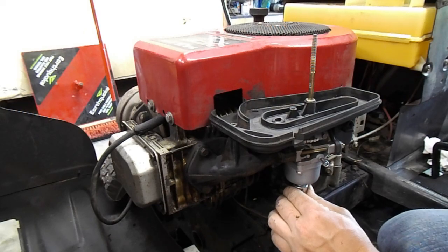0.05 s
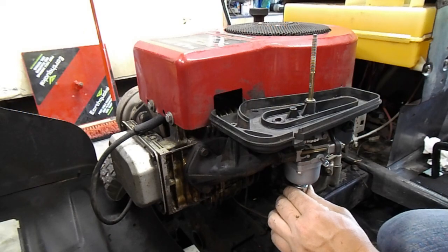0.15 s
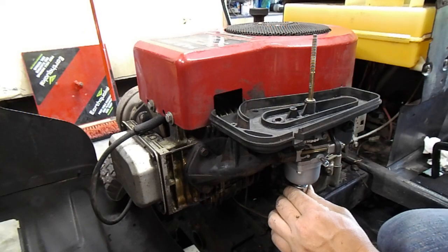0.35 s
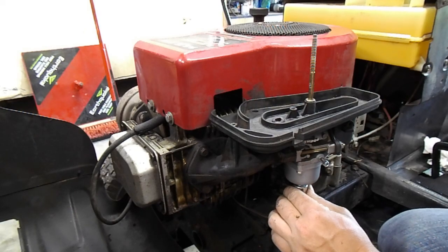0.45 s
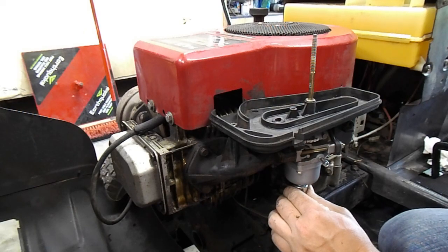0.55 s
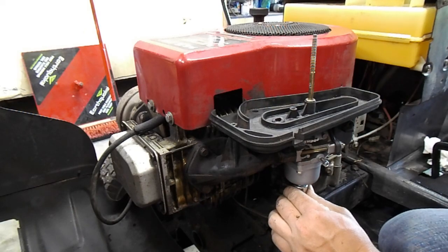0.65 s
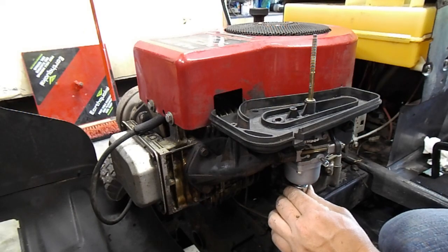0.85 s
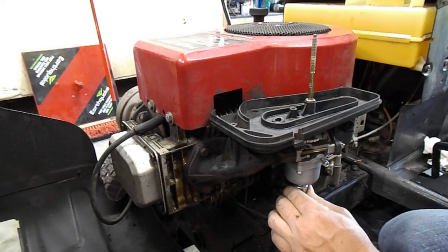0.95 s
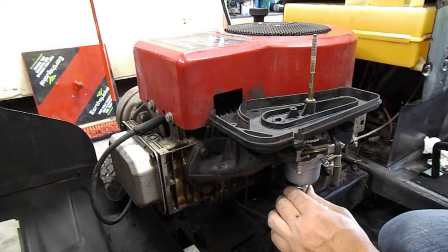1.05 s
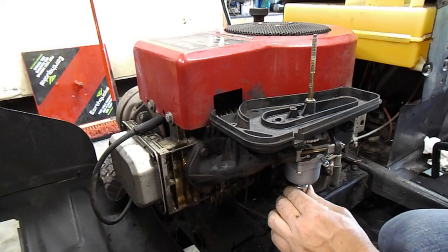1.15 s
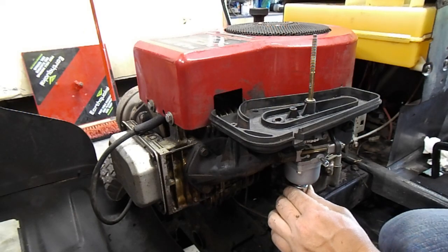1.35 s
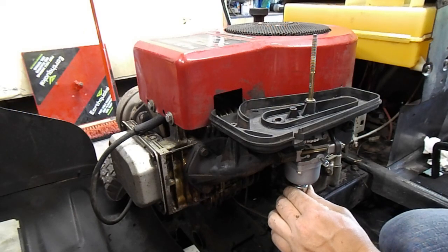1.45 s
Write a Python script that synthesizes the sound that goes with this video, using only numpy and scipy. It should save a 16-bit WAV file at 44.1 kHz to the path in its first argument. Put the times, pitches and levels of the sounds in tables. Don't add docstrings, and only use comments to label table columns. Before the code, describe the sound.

Close mono pickup of a solenoid snapping on and off: crackling contact ticks and a short ringing plunger knock, three times, with thin high wire rubs between, short room echo, low beating hum and soft rush.

```python
import sys
import numpy as np
from scipy import signal
from scipy.fft import rfft, irfft
from scipy.io import wavfile

SR = 44100
rng = np.random.default_rng(int(sys.argv[2]) if len(sys.argv) > 2 else 0)


def wrap_up_sound(samples):
    columns = np.atleast_2d(samples).T
    tamed = np.clip(columns, -1, 1)
    steps = np.round(tamed * 32767).astype(np.int16)
    wavfile.write(sys.argv[1], SR, steps)


def gain_from_db(level_db):
    decades = np.asarray(level_db, float) / 20
    return 10 ** decades


N = 66150


def at_hz(points, hz):
    table_hz, table_db = np.transpose(points)
    return np.interp(np.log(hz), np.log(table_hz), table_db)


def rms_one(x):
    return x / np.sqrt(np.mean(x ** 2) + 1e-20)


def colour(x, db_at):
    hz = np.maximum(np.fft.rfftfreq(len(x), 1 / SR), 10)
    return irfft(rfft(x) * gain_from_db(db_at(hz)), len(x))


def drift(rate_hz):
    r = np.exp(-2 * np.pi * rate_hz / SR)
    wander = signal.lfilter([1], [1, -2 * r, r * r], rng.standard_normal(N + SR))
    return rms_one(wander[SR:])


def envelope(start_s, attack_s, hold_s, t60_s):
    t = np.arange(N) / SR - start_s
    swell = np.clip(t / max(attack_s, 1e-4), 0, 1) ** 2
    return swell * gain_from_db(-60 * np.maximum(t - attack_s - hold_s, 0) / t60_s)


def ring(force, hz, t60_s):
    r = gain_from_db(-60 / (t60_s * SR))
    w = 2 * np.pi * hz / SR
    return signal.lfilter([0, np.sin(w)], [1, -2 * r * np.cos(w), r * r], force + 1e-18)


def chatter(start_s, swell_s, noise):
    force = envelope(start_s, swell_s, 0, swell_s + .003) * noise
    return force / np.sqrt(np.sum(force ** 2) + 1e-20)


# start in seconds, level in dB, swell in seconds, centre in Hz.
TICKS = [(0.0738, -50, 0.0011, 7300), (0.2191, -27.5, .002, 12000), (0.2205, -23, 0.0025, 11000),
         (0.2217, -41, 0.0037, 6320), (0.234, -31.5, 0.00045, 10000), (0.263, -36.5, .0004, 12000),
         (.269, -40, 0.00091, 12000), (0.581, -66, .001, 11300), (0.7774, -40.5, 0.00076, 11000),
         (.7855, -34.5, 0.0036, 9600), (0.791, -32.5, 0.00061, 12900), (0.8, -41, .0004, 12000),
         (.809, -26, 0.0011, 11700), (0.812, -34, 0.0029, 11800), (1.0005, -59, .0004, 9100),
         (1.053, -59, 0.0009, 11000), (1.1464, -33, 0.00086, 10700), (1.151, -34, 0.00084, 11700),
         (1.1509, -31, 0.00054, 6400), (1.153, -35.5, 0.0012, 12000), (1.172, -38.5, 0.00092, 12000),
         (1.187, -34, 0.00035, 12300), (1.192, -34.5, .001, 11800), (1.3977, -53.5, 0.00086, 8500)]
# pitch in Hz, level in dB, time to fall 60 dB in seconds.
STEEL_MODES = [(5860, -18, .02), (6630, -12, .04), (7080, -14, .025), (7930, -11, .07), (8720, -18, .04),
               (9850, -15, .04), (10330, -10, .04), (10800, -8, .04), (11390, -9, .05), (12120, -11, .05),
               (12750, -10, .05), (13100, -13, .04), (14150, -15, .04), (15300, -19, .03)]
# frequency in Hz, level in dB per Hz.
CRACK_SPECTRUM = [(1500, -35), (3000, -12), (6400, -5), (9000, -10), (10800, -2), (13000, -2.5),
                  (15000, -11), (16500, -2.5)]


def ticks():
    crack_db, crack_t60_s = 1.5, 0.033
    steel_db, strike_spread_db = -7, 5.5
    focus_db = 9.5
    crack_noise, contact_noise = rng.standard_normal((2, N))
    spread = rng.standard_normal((len(TICKS), len(STEEL_MODES)))
    lowest_hz = CRACK_SPECTRUM[0][0]

    def crack_shape(hz):
        bass_loss_db = 20 * np.maximum(np.log2(lowest_hz / hz), 0)
        return at_hz(CRACK_SPECTRUM, hz) - bass_loss_db

    crack = rms_one(colour(crack_noise, crack_shape))
    out = np.zeros(N)
    forces = []
    for start_s, db, swell_s, centre_hz in TICKS:
        focused = colour(crack, lambda hz: -focus_db * np.log2(hz / centre_hz) ** 2)
        out += gain_from_db(db + crack_db) * envelope(start_s, swell_s, 0, crack_t60_s) * focused
        forces.append(gain_from_db(db) * chatter(start_s, swell_s, contact_noise))
    forces = np.array(forces)
    centres_hz = np.array(TICKS)[:, 3]
    for k, (hz, db, t60_s) in enumerate(STEEL_MODES):
        near_db = -focus_db * np.log2(hz / centres_hz) ** 2
        strike = gain_from_db(db + steel_db + near_db + strike_spread_db * spread[:, k])
        out += ring(strike @ forces, hz, t60_s)
    return out


# start in seconds, level in dB, centre in Hz, breadth in octaves.
KNOCKS = [(0.2243, -41, 2040, 0.67), (0.2337, -39, 1800, 0.78), (0.2369, -36, 460, 1),
          (.2420, -49, 3200, .6), (.2492, -42, 1800, 0.55), (.2570, -46, 2000, .6),
          (0.2646, -34, 2190, 0.58), (.2650, -38, 4130, 0.55), (0.269, -34.5, 2120, 0.41),
          (0.269, -40, 4250, 0.36), (0.792, -28, 3120, 0.47), (0.7925, -37, 4450, 0.22),
          (.7928, -32.5, 1530, .35), (0.7958, -31, 2800, 0.21), (0.803, -32.5, 3060, 0.17),
          (.8000, -41.5, 1050, .5), (.8125, -39, 1200, .8), (0.9989, -51, 4900, 0.34),
          (1.1570, -44.5, 1810, 0.56), (1.1640, -52, 3000, .7), (1.1721, -41, 1770, .3),
          (1.1745, -46, 3500, 0.44), (1.1800, -48, 3200, 0.65), (1.1872, -31.5, 2300, 0.87),
          (1.1881, -33, 803, 0.47), (1.1923, -33, 2200, 0.25), (1.1955, -35, 860, 0.63)]
# pitch in Hz, level in dB, time to fall 60 dB in seconds.
BOWL_MODES = [(560, -9, .04), (860, -8, .04), (990, -8, .04), (1260, -9, .03), (1570, -6, .025),
              (1980, -4, .09), (2120, -1, .13), (2335, -3, .13), (2700, -5, .05), (2885, -6, .13),
              (3130, -2, .02), (3590, -6, .03), (4300, -7, .015), (4900, -8, .015)]


def knocks():
    bowl_db = -7.5
    puff_db, puff_attack_s, puff_hold_s, puff_t60_s = 10, .0003, .0008, 0.016
    noise = rng.standard_normal(N)
    out = np.zeros(N)
    starts_s, levels_db, centres_hz, breadths = np.transpose(KNOCKS)
    forces = np.zeros((len(KNOCKS), N))
    forces[np.arange(len(KNOCKS)), (starts_s * SR).astype(int)] = 1
    signs = rng.choice([-1, 1], (len(KNOCKS), len(BOWL_MODES)))
    for k, (hz, db, t60_s) in enumerate(BOWL_MODES):
        near_db = -10 * (np.log2(hz / centres_hz) / breadths) ** 2
        strike = signs[:, k] * gain_from_db(db + bowl_db + levels_db + near_db)
        out += ring(strike @ forces, hz, t60_s)
    for start_s, db, hz, octaves in KNOCKS:
        edges_hz = [hz / 2 ** octaves, min(hz * 2 ** octaves, SR / 2.5)]
        band = signal.butter(2, edges_hz, "band", fs=SR, output="sos")
        puff = noise * envelope(start_s, puff_attack_s, puff_hold_s, puff_t60_s)
        out += gain_from_db(db + puff_db) * signal.sosfilt(band, puff)
    return out


# start in seconds, hold in seconds,
# then the levels in dB of the mid, the high and the low squeal.
RUBS = [
    (0.097, 0.044, -73, -73, -99),
    (0.185, .02, -67, -67, -99),
    (0.413, 0.029, -54, -59, -69),
    (0.459, 0.026, -63, -70, -70),
    (0.54, 0.019, -79, -76, -87),
    (0.688, 0.027, -62, -53, -83),
    (0.723, 0.12, -55, -64, -66),
    (1.09, .041, -79, -69, -91),
    (1.22, 0.025, -57, -62, -67),
    (1.378, 0.039, -65, -77, -91),
]
# pitch in Hz, width in Hz, level in dB.
MID_SQUEAL = [(12400, 170, 0), (13200, 130, -11), (14420, 130, -11)]
HIGH_SQUEAL = [(14930, 170, -2), (15280, 300, -3)]
LOW_SQUEAL = [(6390, 140, 0), (6920, 90, -6)]


def squeals():
    attack_s, t60_s = .005, .22
    flutter_db, flutter_hz = 1.5, 40
    out = np.zeros(N)
    shapes = np.array([envelope(start_s, attack_s, hold_s, t60_s) for start_s, hold_s, *_ in RUBS])
    for k, lines in enumerate([MID_SQUEAL, HIGH_SQUEAL, LOW_SQUEAL]):
        tone = np.zeros(N)
        for hz, width_hz, db in lines:
            once = ring(rng.standard_normal(N), hz, 2 / width_hz)
            tone += gain_from_db(db) * rms_one(ring(once, hz, 2 / width_hz))
        loudness = gain_from_db(np.array(RUBS)[:, 2 + k]) @ shapes
        out += tone * loudness * gain_from_db(flutter_db * drift(flutter_hz))
    return out


def room(x):
    level_db, delay_s = -5.5, 0.0028
    low_t60_s, treble_t60_s = 0.31, 0.3
    t = np.arange(SR // 2) / SR
    noise = rng.standard_normal(len(t))
    low = signal.sosfilt(signal.butter(2, 4000, fs=SR, output="sos"), noise)
    tail = low * gain_from_db(-60 * t / low_t60_s) + (noise - low) * gain_from_db(-60 * t / treble_t60_s)
    tail *= np.clip(t / delay_s - .5, 0, 1)
    tail /= np.sqrt(np.sum(tail ** 2))
    return gain_from_db(level_db) * signal.fftconvolve(x, tail)[:N]


# steps of the beat above the main tone, level in dB rms, lead in cycles.
HUM = [(-1, -80.5, -.25), (0, -59.9, 0), (1, -66.9, 0), (2, -75, .25)]


def hum():
    main_hz, beat_hz, beat_peak_s = 227.49, 12.45, .012
    t = np.arange(N) / SR - beat_peak_s
    out = np.zeros(N)
    for steps, db, lead in HUM:
        cycles = (main_hz + beat_hz * steps) * t + lead
        out += np.sqrt(2) * gain_from_db(db) * np.cos(2 * np.pi * cycles)
    return out


# frequency in Hz, level in dB per Hz.
RUSH_SPECTRUM = [(195, -16.5), (290, -9.5), (600, -0.2), (1900, -2), (2700, -8.5), (4500, -14),
                 (8000, -18.5), (16000, -23)]


def rush():
    level_db, patchy_db, patchy_hz = -53, 0.95, 3.3
    bass_slope_db = 4
    lowest_hz = RUSH_SPECTRUM[0][0]

    def rush_shape(hz):
        return at_hz(RUSH_SPECTRUM, hz) + bass_slope_db * np.minimum(np.log2(hz / lowest_hz), 0)

    air = rms_one(colour(rng.standard_normal(N), rush_shape))
    return gain_from_db(level_db + patchy_db * drift(patchy_hz)) * air


def scene():
    bass_cut = signal.butter(4, 140, "high", fs=SR, output="sos")
    near = signal.sosfilt(bass_cut, ticks() + knocks())
    mix = near + room(near) + squeals() + hum() + rush()
    return mix[None]


def band_limit(x):
    return signal.sosfilt(signal.butter(12, 16490, fs=SR, output="sos"), x)


def record(dry):
    top_cut = signal.cheby2(14, 45, 15900, fs=SR, output="sos")
    mix = signal.sosfilt(top_cut, dry)
    return band_limit(mix)


dry = scene()
out = record(dry)
wrap_up_sound(out)
```